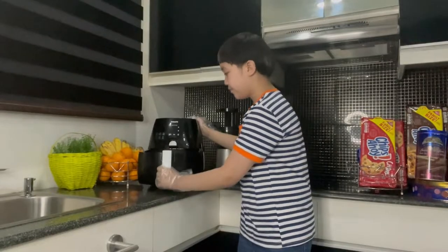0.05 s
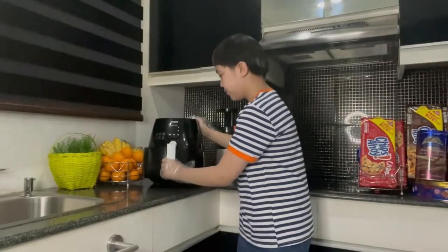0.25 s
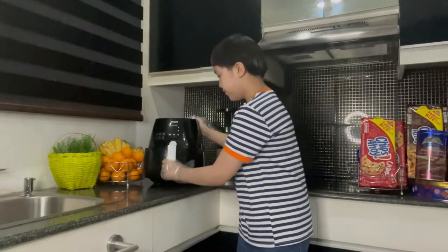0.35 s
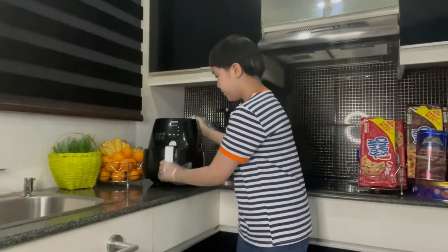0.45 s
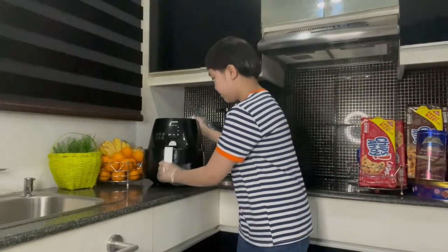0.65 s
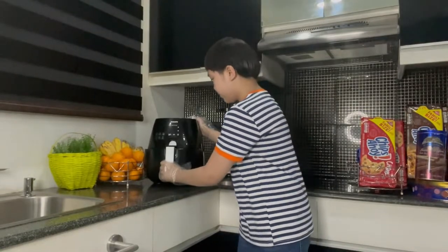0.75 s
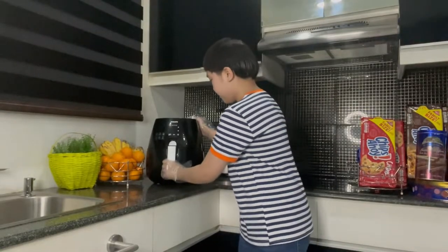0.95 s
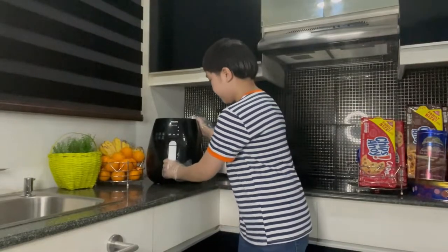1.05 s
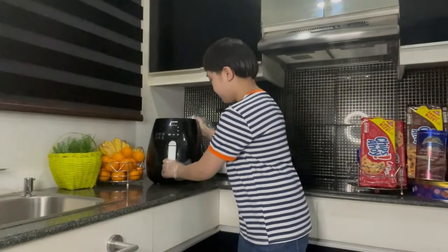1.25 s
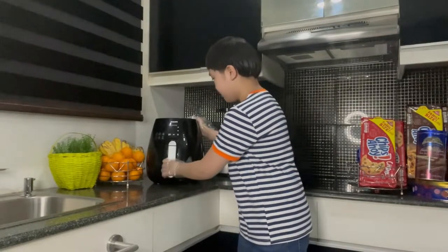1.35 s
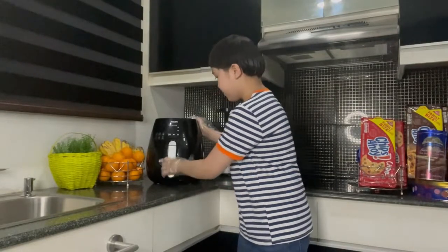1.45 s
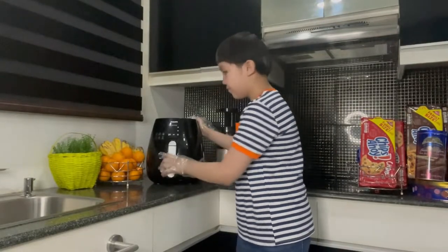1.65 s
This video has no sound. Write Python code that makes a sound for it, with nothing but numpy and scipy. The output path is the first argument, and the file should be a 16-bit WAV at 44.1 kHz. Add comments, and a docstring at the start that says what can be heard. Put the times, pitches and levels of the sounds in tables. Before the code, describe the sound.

An air fryer basket is pushed into its housing in a tiled kitchen. The metal pan clatters onto its rails, slides with a light scrape, clicks and seats with a hollow knock, heard from a few metres away.

```python
"""A tiled kitchen, a few metres from the counter: an air fryer basket is pushed into its housing.
The rim drags, and the metal pan clatters onto its rails, slides in with a light scrape, clicks past
the catch and seats with a hollow knock. Each impact excites the modes of the plastic shell and the pan,
and panels flex with hollow notes. The room reverberates over quiet background noise."""
import sys
import numpy as np
from scipy import signal
from scipy.fft import rfft, irfft
from scipy.io import wavfile
from scipy.ndimage import uniform_filter1d

SR = 44100
rng = np.random.default_rng(int(sys.argv[2]) if len(sys.argv) > 2 else 0)


def master(y):
    """Save y as 16-bit WAV."""
    cut = np.clip(np.atleast_2d(y).T, -1, 1)
    pcm = np.round(cut * 32767)  # scale
    wavfile.write(sys.argv[1], SR, pcm.astype(np.int16))


N = 74970

# impacts of basket on housing, in relative levels
# (time [s], thump [dB], body [dB], clack [dB], tick [dB])
IMPACTS = [(0.222, -67, -34.5, -36.5, -42.5), (0.243, -34, -31, -30, -33), (0.262, -19.5, -26, -33.5, -23),
           (0.274, -48, -21.5, -19, -32), (0.285, -58, -14.5, -26.5, -39.5), (0.302, -40, -15.5, -17, -30),
           (0.320, -21, -32, -23.5, -30), (0.332, -53, -15, -26, -28.5), (0.341, -44, -16.5, -29, -35.5),
           (0.366, -45, -31.5, -22, -40), (0.379, -30, -28, -62, -58), (0.441, -67, -30, -35.5, -79),
           (0.462, -69, -28.5, -40.5, -53.5), (0.579, -47, -31, -34.5, -55),
           (0.587, -47.5, -31, -27.5, -59), (0.627, -57, -31, -41, -45), (0.776, -42, -49.5, -37.5, -42.5),
           (1.029, -27, -34.5, -38.5, -45), (1.069, -55, -39.5, -23.5, -27),
           (1.094, -24.5, -12, -19, -40.5), (1.116, -28, -17.5, -25, -57), (1.138, -30, -18, -53, -59),
           (1.227, -42, -29.5, -42.5, -82), (1.377, -38.5, -50, -44.5, -48)]
BANDS_HZ = 31.25 * 2 ** np.arange(0, 9.1, .5)  # half-octave centres


def undb(db):
    """Amplitude ratio of a level in decibels."""
    return 10 ** (np.asarray(db) / 20)


def at(hz, table, column=1):
    """Interpolation of a table's column on a logarithmic frequency axis."""
    table = np.array(table)
    return np.interp(np.log(hz), np.log(table[:, 0]), table[:, column])


def band_noise(hz):
    """Two uncorrelated half-octave noises of unit rms."""
    octaves = np.log2(np.maximum(np.fft.rfftfreq(N, 1 / SR), 1) / hz)
    passband = np.cos(np.pi / 2 * np.clip(2 * octaves, -1, 1))
    noise = irfft(rfft(rng.standard_normal((2, N))) * passband, N)
    return noise / noise.std(axis=1, keepdims=True)


def stereo(pair, hz, side_db=0):
    """Sum and difference turn mid and side into left and right, wider towards the treble."""
    # stereo width (frequency [Hz], side relative to mid [dB])
    width = [(40, -17), (125, -11.5), (500, -1.9), (2500, -1), (9000, 1.5)]
    side = undb(at(hz, width) + side_db)
    return np.array([pair[0] + side * pair[1], pair[0] - side * pair[1]]) / np.hypot(1, side)


def excitation(hz, levels):
    """Excitation spectrum: how hard an impact drives a given frequency."""
    # centres of thump, body, clack and tick (frequency [Hz])
    centres = [80, 380, 1500, 6500]
    return undb(np.interp(np.log(hz), np.log(centres), levels))


def decay(t, t60):
    """Exponential damping by 60 dB in t60 seconds."""
    return np.exp(-np.log(1000) * t / t60)


def burst(noise, envelope):
    """Overlapping modes act as noise, with the energy that the envelope prescribes."""
    shaped = noise[:, :len(envelope)] * envelope
    return shaped * np.sqrt(np.sum(envelope ** 2) / np.sum(shaped ** 2, axis=1, keepdims=True))


def add(out, sound, start_s):
    """Superposition of a sound on the mix at its starting time."""
    i = max(int(start_s * SR), 0)
    out[:, i:i + sound.shape[1]] += sound[:, :N - i]


def resonator(force, hz, t60):
    """A damped mode convolves the force with its impulse response; successive pushes add in energy."""
    t = np.arange(N) / SR
    impulse_response = np.sin(2 * np.pi * hz * t) * decay(t, t60)
    motion = np.array([signal.fftconvolve(channel, impulse_response)[:N] for channel in force])
    energy = np.sum(force ** 2, axis=1, keepdims=True) * np.sum(impulse_response ** 2)
    return stereo(motion * np.sqrt(energy / np.sum(motion ** 2, axis=1, keepdims=True)), hz)


def room_noise():
    """Stationary noise, strongest in the bass, forms the kitchen's quiet background."""
    # background spectrum (frequency [Hz], band level [dB])
    spectrum = [(30, -74), (55, -71), (90, -62), (140, -68), (500, -86), (15000, -89)]
    return sum(undb(at(hz, spectrum)) * stereo(band_noise(hz), hz) for hz in BANDS_HZ)


def sliding_friction():
    """The amplitude envelope of friction as plastic slides and rubs."""
    # course of the friction (time [s], relative level [dB])
    course = [(0, -60), (.12, -63), (.175, -57.5), (.33, -61), (0.499, -63), (0.752, -58.5), (0.8, -52.5),
              (0.999, -55), (1.26, -55.5), (1.39, -51), (1.481, -55.5), (1.7, -66)]
    times, levels = np.array(course).T
    return undb(np.interp(np.arange(N) / SR, times, levels))


def scrape(friction):
    """Stick-slip friction: tiny random catches of sliding plastic merge into a grainy hiss."""
    # friction spectrum (frequency [Hz], band gain [dB])
    spectrum = [(60, -10), (250, 2), (620, -9.5), (2200, -8), (6500, -3.5), (15500, -4)]
    catches_per_s, spread_db, grain_s = 670, 1.5, 0.0026
    onsets = rng.random(N) < catches_per_s / SR
    catches = onsets * undb(spread_db * np.minimum(rng.exponential(size=N), 4))
    power = signal.lfilter([1], [1, -np.exp(-1 / (grain_s * SR))], catches ** 2)
    grain = np.sqrt((1 + power / power.mean()) / 2)
    hiss = sum(undb(at(hz, spectrum)) * stereo(band_noise(hz), hz) for hz in BANDS_HZ)
    return friction * grain * hiss


def rim_drag():
    """Forced vibration: friction drives the rim's modes in a hollow rasp as pressure swells and eases."""
    # brief drags of the rim (time [s], duration [s], relative level [dB])
    drags = [(0.002, 0.0275, -34.5), (0.138, 0.13, -34)]
    # resonances that the rim excites (frequency [Hz], gain [dB])
    modes = [(518, -3.5), (582, -0.5), (664, 1), (830, 1)]
    t = np.arange(N) / SR
    pressure = np.zeros(N)
    for start, duration, db in drags:
        swell = np.sin(np.pi * np.clip((t - start) / duration, 0, 1))
        pressure += undb(db) * swell / np.sqrt(duration * SR)
    return sum(undb(db) * resonator(rng.standard_normal((2, N)) * pressure, hz, t60=0.077)
               for hz, db in modes)


def shell_knocks():
    """Impact excitation: the plastic shell's dense modes die quickly, the room's reverberation slowly."""
    # spectrum of the shell (frequency [Hz], band gain [dB])
    spectrum = [(30, -17), (50, -7.5), (160, -5.5), (270, -2), (450, -6), (850, -4), (1300, -11.5),
                (2300, -7), (3500, -11.5), (6500, -5.5), (11500, -9), (15500, -15.5)]
    # damping of shell and kitchen (frequency [Hz], shell t60 [s], room t60 [s], room gain [dB])
    damping = [(59, 0.082, 0.56, -6), (325, 0.068, 0.47, -12.5), (1480, 0.11, 0.42, -5.5),
               (6870, 0.14, 0.33, -2.5)]
    attack_cycles, room_build_s = 0.33, 0.0092
    out, t = np.zeros((2, N)), np.arange(N // 2) / SR
    room_build = 1 - np.exp(-t / room_build_s)
    for hz in BANDS_HZ:
        shell_t60, room_t60, room_db = (at(hz, damping, column) for column in (1, 2, 3))
        rise = 1 - np.exp(-t * hz / attack_cycles)
        ring = (rise * decay(t, shell_t60))[:len(t) // 2]
        tail = rise * room_build * decay(t, room_t60) * undb(room_db)
        noise = band_noise(hz)
        direct, diffuse = stereo(noise, hz, side_db=-4), stereo(noise, hz)
        offsets = rng.integers(0, N // 2, (len(IMPACTS), 2))
        for (start, *levels), (i, j) in zip(IMPACTS, offsets):
            gain = excitation(hz, levels) * undb(at(hz, spectrum))
            add(out, gain * burst(direct[:, i:], ring), start)
            add(out, gain * burst(diffuse[:, j:], tail), start)
    return out


def shell_resonances(sound):
    """The shell's crowded upper resonances colour every contact alike, as a minimum-phase filter."""
    spacing_hz, depth_db, full_depth_hz = 55.27, 6, 830
    hz = np.fft.rfftfreq(2 * N, 1 / SR)
    common, left, right = rng.standard_normal((1024, 3)).T
    ripple = np.array([np.interp(hz / spacing_hz, np.arange(1024), common + own / 2)
                       for own in (left, right)])
    depth = depth_db * np.minimum(hz / full_depth_hz, 1) ** 2
    gain = undb(depth * np.tanh(ripple))
    gain /= np.sqrt(uniform_filter1d(gain ** 2, size=2000, axis=1))  # preserves the mean power
    causal_cepstrum = irfft(np.log(gain))[:, :N] * np.where(np.arange(N) > 0, 2, 1)
    response = np.exp(rfft(causal_cepstrum, 2 * N))
    return irfft(rfft(sound, 2 * N) * response)[:, :N]


def struck_body(modes, t60, friction, coupling):
    """Modal superposition: impacts and friction drive each mode as far as the coupling admits."""
    friction_gain_db = 6
    out = np.zeros((2, N))
    for hz, db in modes:
        force = rng.standard_normal((2, N)) * friction * undb(friction_gain_db) * np.sqrt(20 / SR)
        for (start, *levels), lag_cycles in zip(IMPACTS, rng.random((len(IMPACTS), 2))):
            onsets = ((start + lag_cycles / hz) * SR).astype(int)
            force[[0, 1], onsets] += excitation(hz, levels)
        out += undb(db) * resonator(force * coupling, hz, t60)
    return out


def pan_ring(friction, seated):
    """The metal pan vibrates in inharmonic modes, driven less once the housing grips it."""
    # modes of the pan (frequency [Hz], gain [dB])
    modes = [(404, -3), (450, -7.5), (494, -3.5), (664, -6.5), (775, -7), (850, -5), (988, -12.5),
             (1112, -9), (1535, -15), (1715, -9), (2072, -7.5), (2396, -10), (2487, -7.5), (2545, -10.5),
             (3165, -14.5), (3330, -10.5)]
    coupling = np.where(seated, undb(-17), 1)
    return undb(-2) * struck_body(modes, t60=0.24, friction=friction, coupling=coupling)


def panel_flexes():
    """Bending vibration: a pushed panel swells into a slightly unsteady hollow note and dies away."""
    # panel notes (time [s], frequency [Hz], relative level [dB], rise time [s], t60 [s])
    notes = [(0.224, 540, -25.5, 0.0056, 0.29), (0.34, 237.6, -13.5, 0.075, 0.42),
             (0.574, 650, -31, 0.0034, 0.14), (0.619, 236.4, -44, 0.011, 0.89),
             (0.776, 239.6, -34, 0.021, 0.58), (1.021, 354.6, -25, 0.0066, 0.17),
             (1.028, 200, -31, 0.0099, 0.29), (1.098, 161, -21.5, 0.017, 0.42),
             (1.099, 120.7, -33.5, 0.0099, 0.68), (1.103, 51.9, -28, 0.0062, 0.52),
             (1.379, 269.5, -34.5, 0.008, 0.38)]
    out, t = np.zeros((2, N)), np.arange(N) / SR
    for start, hz, db, rise_s, t60 in notes:
        waver = uniform_filter1d(rng.standard_normal(N), size=400)
        depth = 0.037 * (hz / 220) ** 1.07  # rms share of the pitch: higher notes are rougher
        phase = 2 * np.pi * hz * np.cumsum(1 + depth * waver / waver.std()) / SR
        note = stereo(np.array([np.sin(phase), np.cos(phase)]), hz, side_db=-4) * np.sqrt(2)
        envelope = (1 - np.exp(-t / rise_s)) * decay(t, t60)
        add(out, undb(db) * note * envelope, start)
    return out


def housing_boom(seated):
    """Resonance of the closed housing: impacts excite its hollow modes once the basket is seated."""
    # modes of the closed housing (frequency [Hz], gain [dB])
    modes = [(338, -6), (370, -6), (405, -16), (578, -4.5), (655, -6), (810, -6.5), (1150, -5), (1335, -13),
             (1550, -9.5), (2110, -3.5)]
    return undb(-3.5) * struck_body(modes, t60=0.18, friction=0, coupling=seated)


def scene():
    """Sound pressures add: plastic, pan, housing, rim and panels over the kitchen's background."""
    seating_s = 0.97
    seated = np.arange(N) / SR > seating_s
    friction = sliding_friction()
    plastic = shell_resonances(shell_knocks() + scrape(friction))
    ringing = pan_ring(friction, seated) + housing_boom(seated)
    return plastic + ringing + rim_drag() + panel_flexes() + room_noise()


def record(dry):
    """Frequency response: the microphone has two treble dips; the recorder cuts rumble and the top."""
    # dips in the microphone's response (frequency [Hz], width [Hz], gain [dB])
    dips = [(8970, 804, -14), (14630, 1730, -14)]
    low_cut_hz, high_cut_hz = 40.7, 15900
    hz = np.fft.rfftfreq(2 * N, 1 / SR)
    response = undb(sum(db * np.exp(-((hz - centre) / width) ** 2) for centre, width, db in dips))
    sound = irfft(rfft(dry, 2 * N) * response)[:, :N]
    sound = signal.sosfilt(signal.butter(6, low_cut_hz, "high", fs=SR, output="sos"), sound)
    return signal.sosfilt(signal.ellip(10, .2, 80, high_cut_hz, fs=SR, output="sos"), sound)


dry = scene()
out = record(dry)
master(out)
```